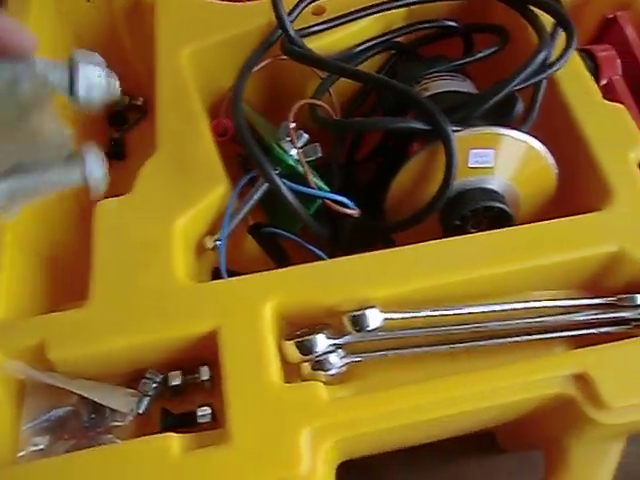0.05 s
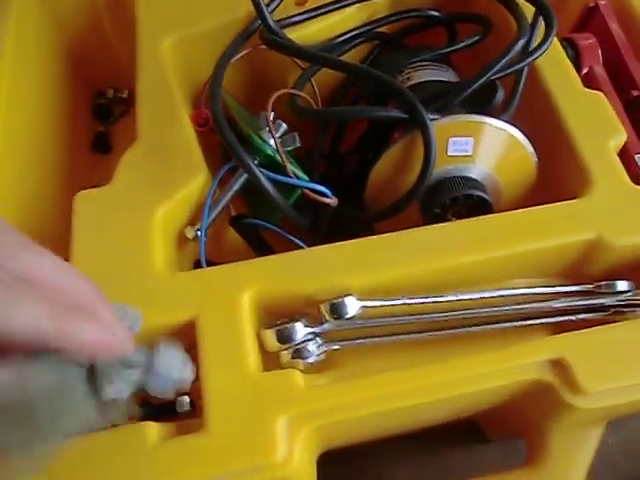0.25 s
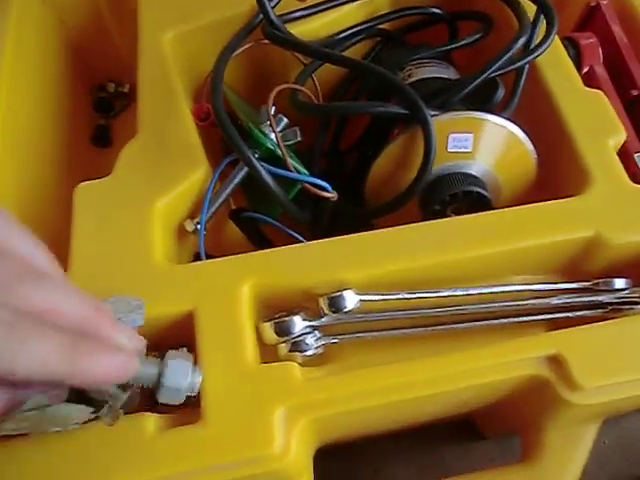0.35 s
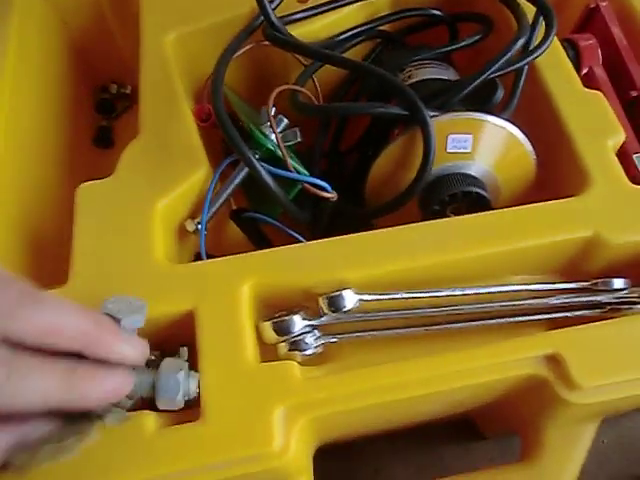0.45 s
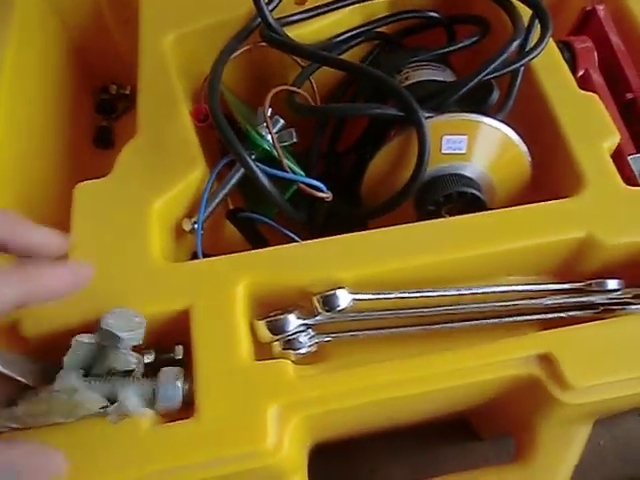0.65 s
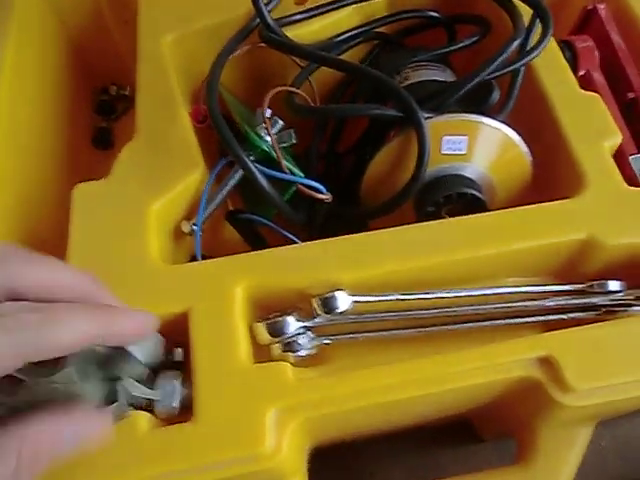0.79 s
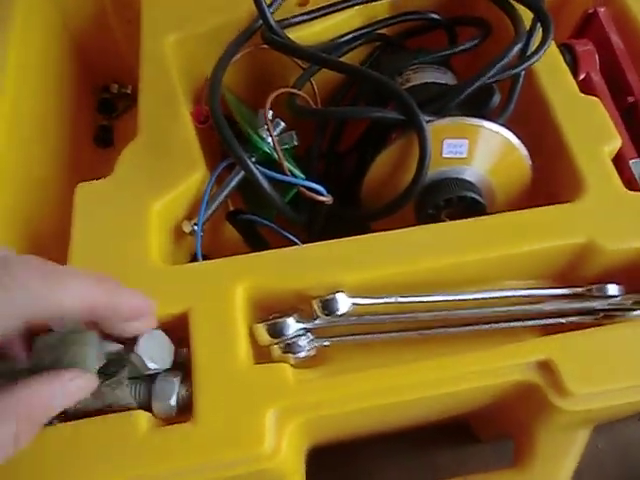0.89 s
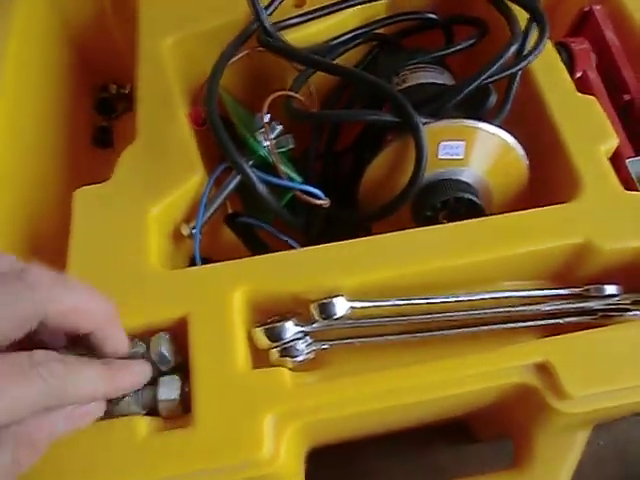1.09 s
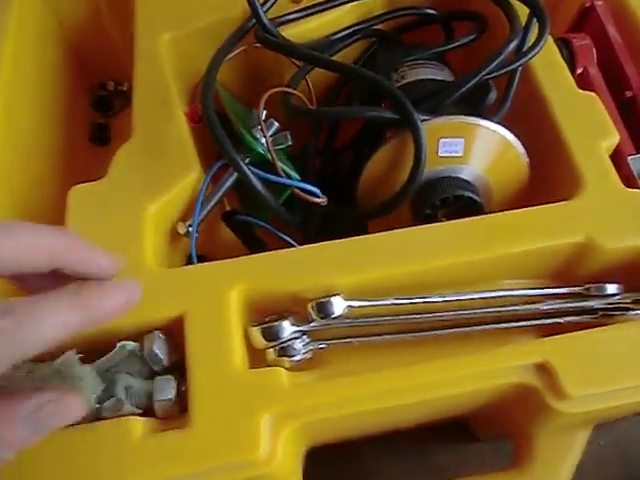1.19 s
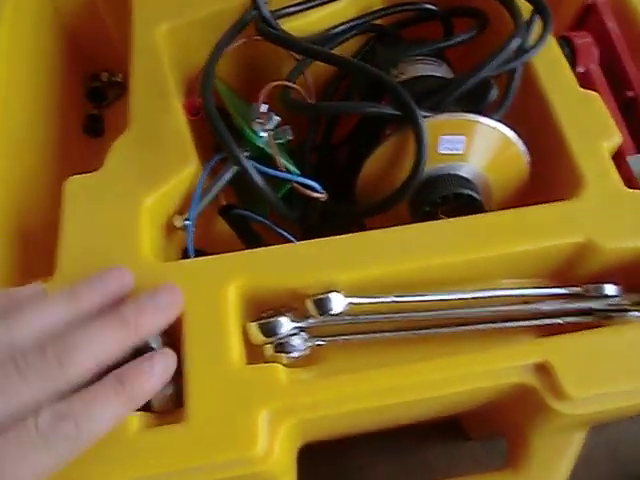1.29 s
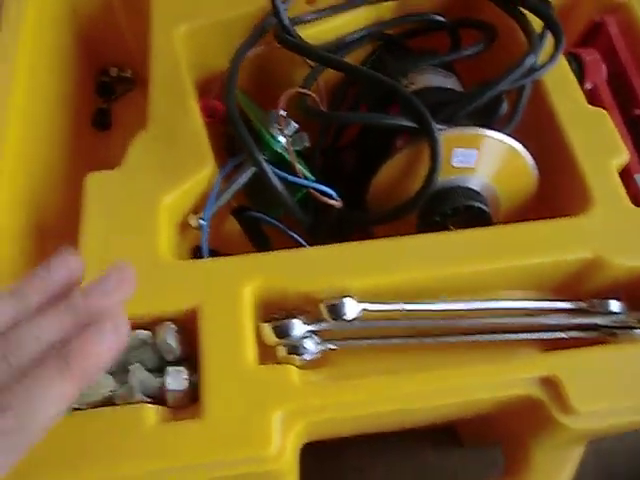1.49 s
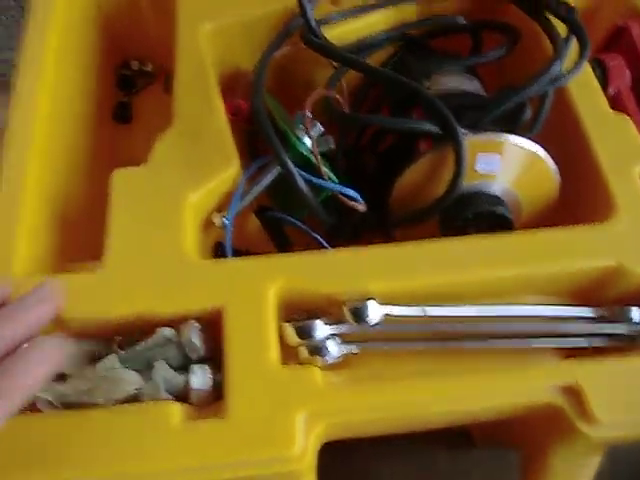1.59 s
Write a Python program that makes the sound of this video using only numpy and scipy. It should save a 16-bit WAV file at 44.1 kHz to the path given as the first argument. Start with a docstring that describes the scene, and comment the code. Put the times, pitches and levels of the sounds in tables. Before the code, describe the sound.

Thin plastic rustles and hollow knocks sound as bagged bolts are pressed into a toolbox.

```python
"""A bag of bolts in a toolbox

A thin plastic bag of steel bolts is dropped into a moulded toolbox and pushed home. Each impact
excites the damped modes of the hollow tray, and one bolt rings briefly. Creases in the bag buckle
with snaps and crinkles, while the hand bumps the box and sliding friction makes it rumble.
The room is small and quiet, with a faint mains hum."""
import sys
import numpy as np
from scipy import signal
from scipy.fft import rfft, irfft
from scipy.io import wavfile

SR = 44100
rng = np.random.default_rng(int(sys.argv[2]) if len(sys.argv) > 2 else 0)


def bounce(signal):
    """Save signal as a 16-bit WAV file at the path given by the first command-line argument."""
    frames = np.transpose(np.atleast_2d(signal))
    limited = np.clip(frames, -1, 1)
    pcm = np.round(limited * 32767).astype(np.int16)
    wavfile.write(sys.argv[1], SR, pcm)


N = 72765
SIZE = 8192  # samples in one short event or filter
T, HZ = np.arange(SIZE) / SR, np.fft.rfftfreq(SIZE, 1 / SR) + 1
SCENE_T = np.arange(N) / SR
SNAP_T60_S, CREASE_DB, CREASE_OCTAVES = .0077, 10, .16  # a crease's decay and resonance peak


def amp(db):
    """Amplitude ratio of a level in decibels."""
    return 10 ** (np.asarray(db) / 20)


def unit(x):
    """Normalisation to an energy of 1."""
    return x / (np.linalg.norm(x) + 1e-12)


def curve(points, hz=HZ):
    """Interpolation on a log-frequency axis."""
    point_hz, value = np.transpose(points)
    return np.interp(np.log(hz), np.log(point_hz), value)


def add(mix, start_s, sound):
    """Superposition: a sound joins the mix at start_s."""
    part = mix[max(round(start_s * SR), 0):][:len(sound)]
    part += sound[:len(part)]


def decay(t60_s):
    """Exponential damping, 60 dB in t60_s."""
    return np.exp(-np.log(1000) * T / max(t60_s, 1e-4))


def burst(t60_s):
    """Decaying white noise from impulses of random sign."""
    return unit(rng.choice([-1., 1.], SIZE) * decay(t60_s))


def peak(hz, octaves):
    """A resonance peak, drawn as a Gaussian of height 1 in log frequency."""
    return np.exp(-.5 * (np.log2(HZ / hz) / octaves) ** 2)


def colour(x, gain_db):
    """Minimum-phase filtering: folding the cepstrum makes the response causal."""
    cepstrum = irfft(np.log(amp(gain_db)))
    cepstrum[1:SIZE // 2] *= 2
    cepstrum[SIZE // 2 + 1:] = 0
    return signal.fftconvolve(x, irfft(np.exp(rfft(cepstrum))))[:len(x)]


def modal_ring(modes, scatter_db=1.5, detune=.008, t60_stretch=1.11):
    """An impulse response is a sum of damped modes; level and tuning scatter from blow to blow."""
    ring = np.zeros(SIZE)
    for hz, db, t60_s in modes:
        level_draw, pitch_draw = rng.standard_normal(2)
        envelope = amp(db + scatter_db * level_draw) * decay(t60_s * t60_stretch)
        ring += envelope * np.cos(2 * np.pi * hz * (1 + detune * pitch_draw) * T)
    return unit(ring)


def tray_knocks():
    """Impact excitation: the spot struck weights the tray's modes; hard blows crack, padded are dull."""
    # bolt impacts: start_s, level_db, pitch_hz, bass_db, crack_db, rattle_time_constant_s
    impacts = [(0.2362, 1, 870, 7, -3.5, .001), (.2378, -3.5, 321, 3, -6, 0.0041),
               (0.263, -12, 634, -2, -15, 0.0025), (0.278, -18, 700, -6, -16, 0.0023),
               (0.29, -27, 200, 8, -11, 0.0026), (0.318, -25.5, 1250, -58, -1.5, 0.0022),
               (0.3499, -8, 1200, -21, -7.5, 0.00082), (0.362, -16.5, 537, -18, -19, 0.0013),
               (0.504, -22.5, 500, -8.5, -46, 0.011), (.644, -21, 480, -6, -29, 0.0057),
               (0.7631, -19.5, 640, -0.5, -6.5, 0.006), (0.767, -24.5, 281, 6, -33, 0.0042),
               (0.7995, -17.5, 1280, -11.5, -14, 0.003), (0.8845, -9, 1090, 5.5, -0.5, 0.0026),
               (0.8866, -7, 480, -1.5, -22, 0.00067), (.890, -10, 1210, -14, -14.5, 0.0046),
               (0.902, -35, 300, -4, 0, 0.0024), (0.9893, -15.5, 586, 6, -5, 0.0077),
               (.9955, -14.5, 517, 1.5, -15.5, .002), (1.002, -17.5, 250, -2, -36, 0.0029),
               (1.093, -16.5, 650, 4, -10, 0.018), (1.109, -17, 550, -9, -10, 0.005),
               (1.1157, -16.5, 740, 17.5, -5.5, 0.0024), (1.122, -14, 1080, -10, -10.5, 0.009),
               (1.146, -23, 324, -13, -32, 0.0082), (1.229, -29.5, 250, -11, -10, 0.0018),
               (1.353, -20.5, 1350, -9, -17.5, 0.00086), (1.456, -30, 1130, -29, -9, 0.0011)]
    # the tray's modes: pitch_hz, level_db, nominal_t60_s
    tray_modes = [(196, -8, .08), (250, 0, .09), (316, 2, .07), (385, -5, .045), (512, 0, .045),
                  (570, -2, .035), (618, -4, .045), (765, 0, .04), (835, -4, .025), (959, -3, .03),
                  (1154, 1, .035), (1275, -2, .03), (1400, -2, .028), (1775, -4, .028), (2400, -12, .025),
                  (2850, -11, .025)]
    # high modes that a hard blow reaches: pitch_hz, level_db, nominal_t60_s
    hard_modes = [(1775, -3, .03), (3054, 0, .018), (3485, 0, .016), (3976, -6, .02), (4294, -4, .016),
                  (5340, 0, .016), (6380, -6, .018)]
    # dense ringing of the shell: frequency_hz, level_db
    shell_spectrum = [(40, -19), (100, -11.5), (250, 4.5), (380, 4), (470, 4), (750, 4.5), (1300, 13.5),
                      (1900, -9.5), (2500, -14), (6000, -30), (16000, -78)]
    # contact noise: frequency_hz, level_db
    crack_spectrum = [(100, -12.5), (700, -11), (1600, -0.5), (2400, -8.5), (3200, 1.5), (4400, -4.5),
                      (5300, -2), (7400, -13), (10500, -7.5), (16000, -26.5)]
    # treble response of the soft plastic: frequency_hz, gain_db
    plastic_treble = [(1300, 0), (1600, -13.5), (3000, 5), (5000, -14), (16000, -21)]
    out, hard_ring = np.zeros(N), modal_ring(hard_modes)
    response_db = curve(plastic_treble) - 10 * np.log10(1 + (410 / (HZ + 10)) ** 2)  # with a bass cut
    for start_s, db, hz, bass_db, crack_db, rattle_s in impacts:
        force = (T == 0) + amp(-8) * burst(rattle_s * np.log(1000))  # an impulse, then rattle
        ring = modal_ring(tray_modes) + amp(-9) * unit(colour(burst(t60_s=.025), curve(shell_spectrum)))
        vibration = signal.fftconvolve(force, ring)[:SIZE]
        spot_db = 9 * peak(hz, octaves=.25) + bass_db / (1 + (HZ / 380) ** 4)
        padding_db_per_octave = .46 * min(crack_db, 0)
        dull_db = padding_db_per_octave * np.maximum(np.log2(HZ / hz), 0)
        body = unit(colour(vibration, spot_db + dull_db + response_db))
        contact = unit(colour(burst(t60_s=.01), curve(crack_spectrum))) + amp(-4) * hard_ring
        crack = unit(colour(contact, padding_db_per_octave * np.maximum(np.log2(HZ / 3000), 0)))
        add(out, start_s, amp(db) * (amp(11) * body + amp(12.5 + crack_db) * crack))
    return out


def bolt_clinks():
    """Free vibration: steel struck on steel rings in two high modes."""
    # blows on the bolt: start_s, level_db
    blows = [(.2365, -30.5), (0.247, -31)]
    # the bolt's modes: pitch_hz, level_db, t60_s
    bolt_modes = [(7978, -8, .06), (10414, 0, .13)]
    out = np.zeros(N)
    for start_s, db in blows:
        for hz, mode_db, t60_s in bolt_modes:
            add(out, start_s, amp(db + mode_db) * decay(t60_s) * np.sin(2 * np.pi * hz * (T + start_s)))
    return out


def film_db(on_tray=True):
    """Radiation from thin film is bright; coupling to the tray adds midrange."""
    # the bag's film: frequency_hz, level_db
    film_spectrum = [(100, -43), (600, -15.5), (1250, -10), (2100, -3.5), (3000, -0.5), (6000, -2),
                     (8200, -5.5), (10700, -4), (13500, -11.5), (16000, -14)]
    return curve(film_spectrum) + on_tray * 10.5 * peak(hz=1200, octaves=.29)


def bag_snaps(landing_s=.236, strain_samples=512):
    """Buckling: a crease strains, then flips in a short burst, more clearly pitched when loud."""
    # creases flipping: flip_s, level_db, pitch_hz
    creases = [(.062, -28, 3500), (0.0777, -34, 10800), (0.0897, -28, 6100), (0.1003, -27, 5260),
               (.1195, -28.5, 13000), (0.1268, -40, 11100), (0.167, -28.5, 4400), (0.1896, -24.5, 3380),
               (0.2218, -26, 5150), (0.2226, -19.5, 5360), (0.227, -20, 5400), (.281, -18, 10600),
               (0.328, -22.5, 4200), (0.338, -18, 6400), (0.3573, -24.5, 6350), (.3929, -30.5, 3220),
               (0.4146, -32, 6500), (0.4203, -35, 6700), (0.4438, -33.5, 4940), (0.4604, -29, 2870),
               (0.4794, -32, 6260), (0.4862, -29, 6100), (0.501, -31.5, 6700), (0.5073, -28, 5240),
               (0.5232, -28.5, 6600), (.5337, -35, 9100), (0.5621, -21.5, 4850), (0.5959, -36, 6060),
               (0.6039, -28.5, 6700), (0.6324, -33, 6430), (.706, -27, 10250), (0.7485, -24, 5900),
               (0.7563, -26, 6300), (0.7672, -33, 6440), (0.865, -30, 4800), (0.8741, -27.5, 4850),
               (0.884, -22, 5300), (0.9005, -32, 4470), (0.9169, -20.5, 6600), (0.9611, -14, 4790),
               (0.9705, -28.5, 4640), (1.001, -24, 5400), (1.0272, -33, 2610), (1.0598, -32, 5040),
               (1.0986, -24, 5200), (1.1154, -22, 4760), (1.1538, -42, 5500), (1.1803, -35, 4000),
               (1.203, -17.5, 3600), (1.2069, -25, 10600), (1.2136, -16, 10600), (1.2135, -20, 2870),
               (1.2266, -23, 5200), (1.2412, -29.5, 5600), (1.333, -26, 4750), (1.3365, -23, 2700),
               (1.351, -23, 5840), (1.3595, -20.5, 4130), (1.3723, -20.5, 5600), (1.3902, -30, 5550),
               (1.457, -28, 2850), (1.4661, -29, 3100), (1.4815, -35.5, 5200), (1.5, -30.5, 3000),
               (1.5065, -27, 5400), (1.534, -45.5, 2870)]
    out = np.zeros(N)
    for flip_s, db, hz in creases:
        strain = amp(-11) * burst(t60_s=.009)[:strain_samples][::-1]  # swells up to the flip
        buckle = np.concatenate([strain, burst(SNAP_T60_S)])
        ring_db = CREASE_DB + 6 * np.clip((db + 22) / 10, 0, 1)
        snap = colour(buckle, film_db(flip_s > landing_s) + ring_db * peak(hz, CREASE_OCTAVES))
        add(out, flip_s - strain_samples / SR, amp(13.5 + db) * unit(snap))
    return out


def bag_crinkle(creases_per_s=1100, spread_db=3.5, pitch_count=16, fall_s=.005):
    """Shot noise: each push buckles a crowd of tiny creases over the friction hiss of sliding film."""
    # finger pushes: start_s, length_s, rise_s, level_db
    pushes = [(0, 0.049, 0.0017, -49), (0.051, 0.057, 0.0091, -39), (0.096, 0.067, 0.012, -54),
              (0.199, 0.17, 0.045, -38.5), (0.378, 0.15, 0.0065, -56), (0.473, 0.11, 0.041, -44),
              (0.575, 0.069, 0.018, -49), (0.638, 0.13, 0.039, -51.5), (0.773, 0.14, .02, -59),
              (.84, 0.067, 0.029, -33.5), (.92, 0.13, 0.0055, -45.5), (1.065, .07, 0.023, -39.5),
              (1.144, 0.019, 0.01, -38.5), (1.162, 0.058, 0.041, -41.5), (1.315, 0.081, 0.026, -42),
              (1.44, 0.052, 0.011, -44)]
    effort, crackle = np.zeros(N), np.zeros(N)
    for start_s, length_s, rise_s, db in pushes:
        rise = (SCENE_T - start_s) / rise_s
        fall = (start_s + length_s - SCENE_T) / fall_s + .5
        effort += amp(db) * np.clip(np.minimum(rise, fall), 0, 1)
    strength = amp(spread_db * np.minimum(rng.exponential(1, N), 4))
    impulses = strength * (rng.random(N) < creases_per_s / SR)
    pitch_index = rng.integers(0, pitch_count, N)
    for k, hz in enumerate(np.geomspace(2800, 12000, pitch_count)):
        grain = colour(burst(SNAP_T60_S / 2), film_db() + CREASE_DB * peak(hz, CREASE_OCTAVES))
        crackle += signal.fftconvolve(impulses * (pitch_index == k), grain)[:N]
    hiss = colour(rng.standard_normal(N), film_db())
    return effort * np.sqrt(N) * unit(unit(crackle) + amp(-10.5) * unit(hiss))


def hand_bumps(rise_s=.0023):
    """Damped oscillation: bumped by the hand, the whole box gives a few low swings."""
    # soft bumps: start_s, level_db, pitch_hz
    bumps = [(0.237, -24, 118), (0.297, -41, 85), (0.762, -45.5, 113), (1.115, -32, 110),
             (1.322, -35.5, 103)]
    out = np.zeros(N)
    envelope = np.minimum(T / rise_s, 1) * decay(t60_s=.063)
    for start_s, db, hz in bumps:
        add(out, start_s, amp(db) * envelope * np.sin(2 * np.pi * hz * T))
    return out


def box_rumble():
    """Sliding friction drives a low resonance of the hollow box with noise."""
    # hand and load dragging: start_s, length_s, level_db, pitch_hz
    drags = [(-.02, 0.064, -45.5, 296), (0.013, 0.18, -54, 177), (0.453, 0.23, -57, 241),
             (0.93, 0.16, -48, 260), (1.314, 0.055, -46, 300)]
    # friction noise in the box: frequency_hz, level_db
    drag_spectrum = [(30, -31), (120, -7), (300, -1), (600, 1), (1200, -19), (3000, -27), (16000, -76)]
    out = np.zeros(N)
    for start_s, length_s, db, hz in drags:
        swell = np.sin(np.pi * np.clip((SCENE_T - start_s) / length_s, 0, 1))
        rumble = colour(rng.standard_normal(N), curve(drag_spectrum) + 12.5 * peak(hz, octaves=.14))
        out += amp(db) * swell * np.sqrt(N) * unit(rumble)
    return out


def reverberation(x):
    """Early reflections inside the toolbox precede a faint room tail whose treble is absorbed first."""
    # room reverberation times: frequency_hz, t60_s
    room_t60 = [(100, 0.38), (400, 0.33), (1500, 0.26), (4000, 0.2), (16000, 0.12)]
    hz, t, spectra = signal.stft(rng.standard_normal(SIZE * 2), SR, nperseg=256)
    absorption = np.exp(-np.log(1000) * t / curve(room_t60, hz + 1)[:, None])
    tail = signal.istft(spectra * absorption, SR, nperseg=256)[1]
    response = amp(-17.5) * unit(tail)
    add(response, start_s=.001, sound=amp(-8) * burst(t60_s=.02))
    return signal.fftconvolve(x, response)[:N]


def background(air_db=-56.5, hum_db=-67.5, hum_hz=50):
    """The noise floor: broadband room air and a pure tone of mains hum."""
    # room air: frequency_hz, level_db
    air_spectrum = [(20, -14), (50, -6.5), (90, -15), (160, -16), (300, -17.5), (500, -24), (1000, -31),
                    (2100, -36.5), (2900, -33), (6000, -44), (16000, -46.5)]
    air = np.sqrt(N) * unit(colour(rng.standard_normal(N), curve(air_spectrum)))
    return amp(air_db) * air + amp(hum_db) * np.sin(2 * np.pi * hum_hz * SCENE_T)


def scene():
    """Superposition of direct sound, reflections and background in one channel."""
    direct = tray_knocks() + bolt_clinks() + bag_snaps() + bag_crinkle() + box_rumble() + hand_bumps()
    return (direct + reverberation(direct) + background())[None]


def record(dry):
    """Soft saturation rounds the hardest blow; a low-pass filter then limits the band."""
    ceiling, cutoff_hz = .85, 16000
    low_pass = signal.firwin(401, cutoff_hz, window=("kaiser", 8), fs=SR)
    return signal.oaconvolve(ceiling * np.tanh(dry / ceiling), low_pass[None], "same")


dry = scene()
out = record(dry)
bounce(out)
```